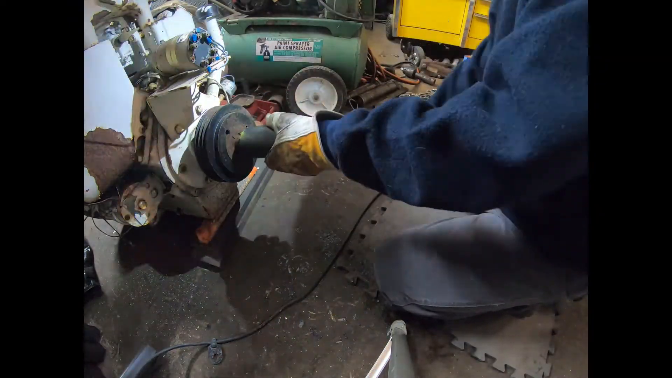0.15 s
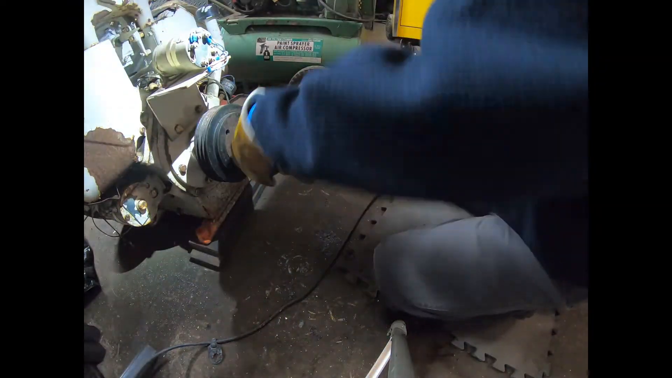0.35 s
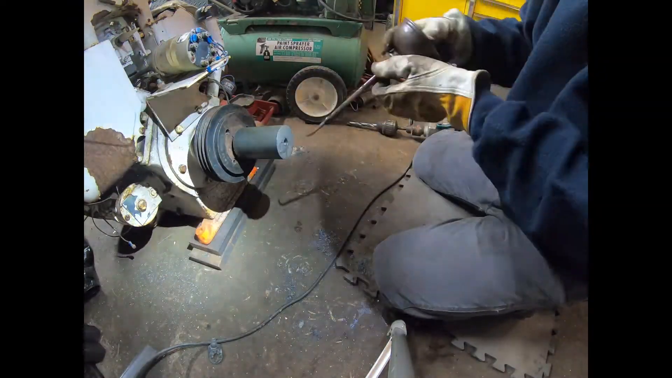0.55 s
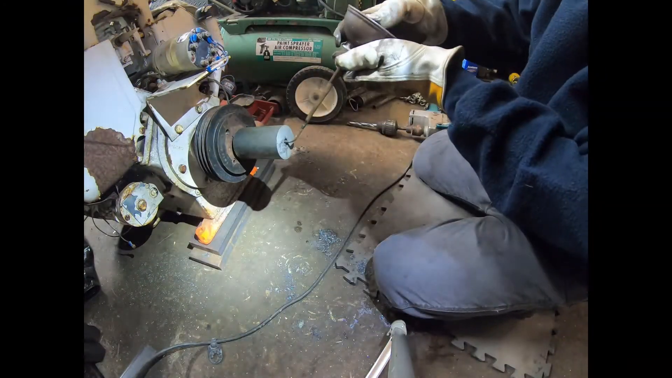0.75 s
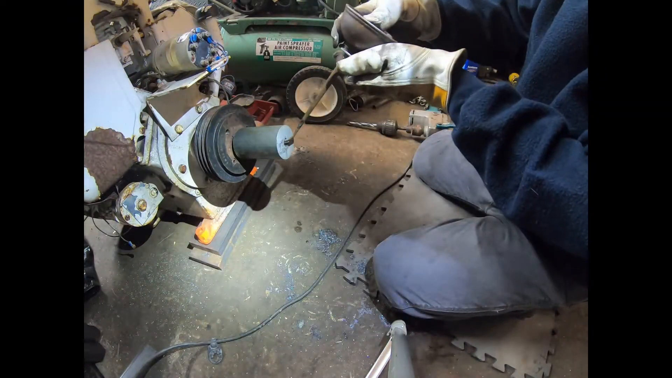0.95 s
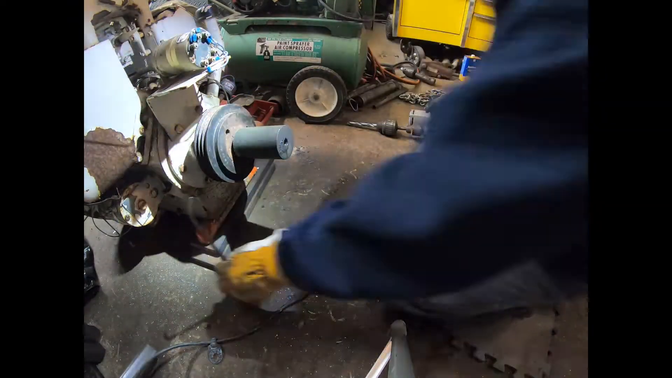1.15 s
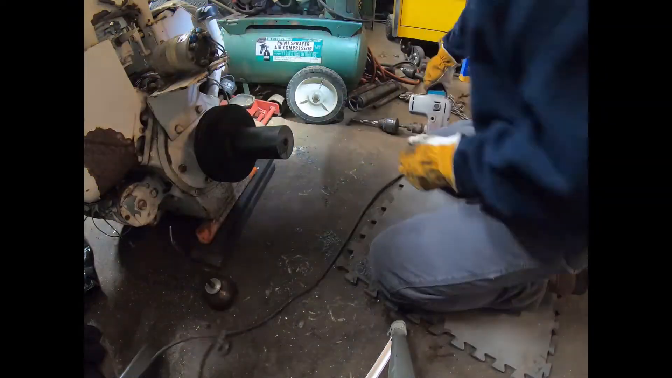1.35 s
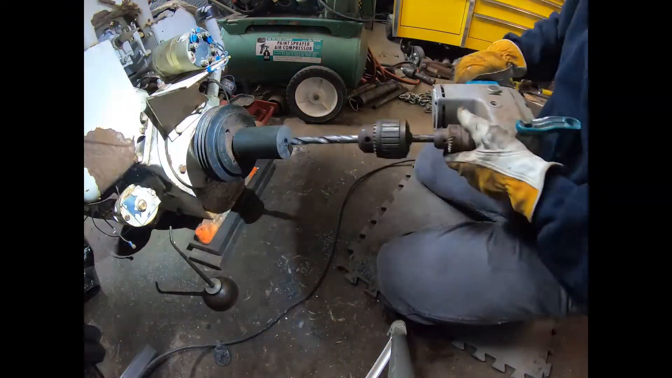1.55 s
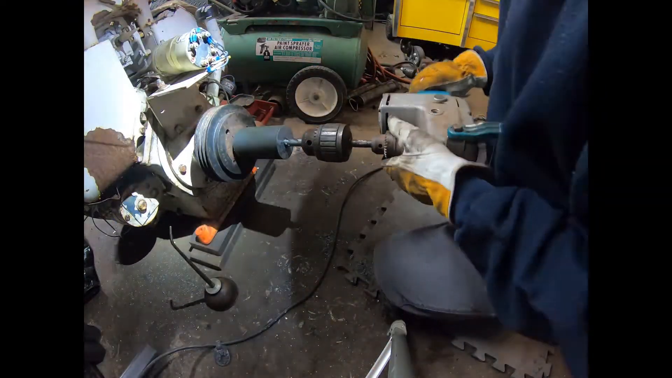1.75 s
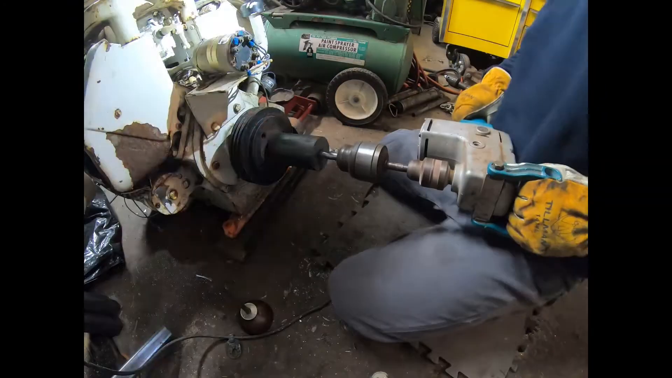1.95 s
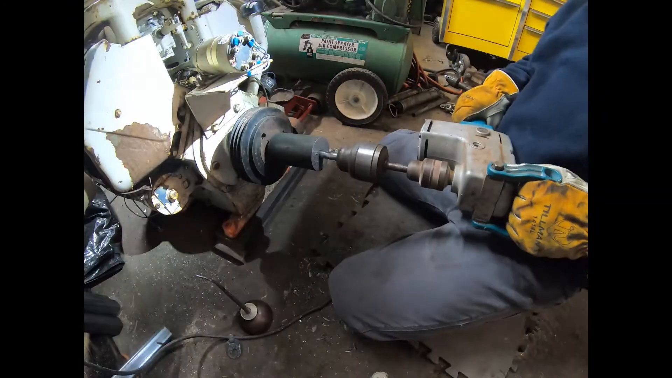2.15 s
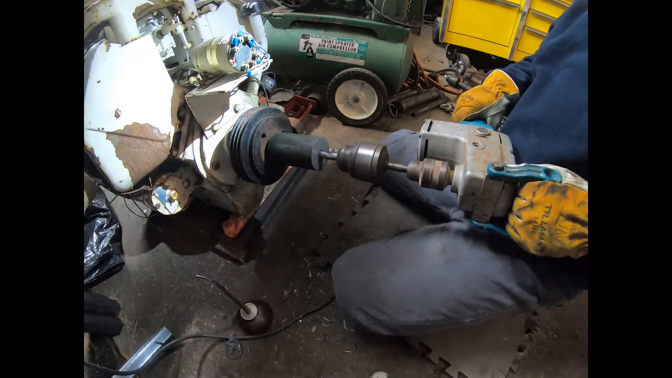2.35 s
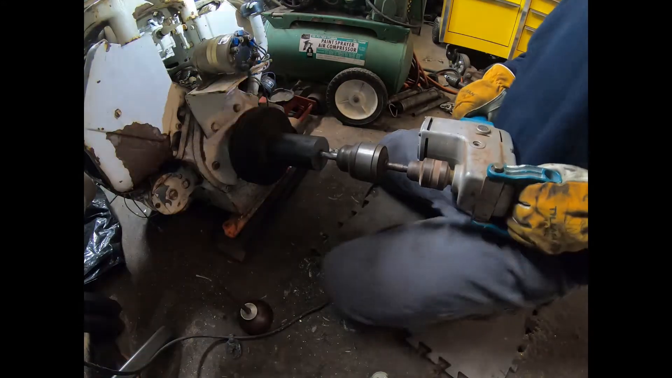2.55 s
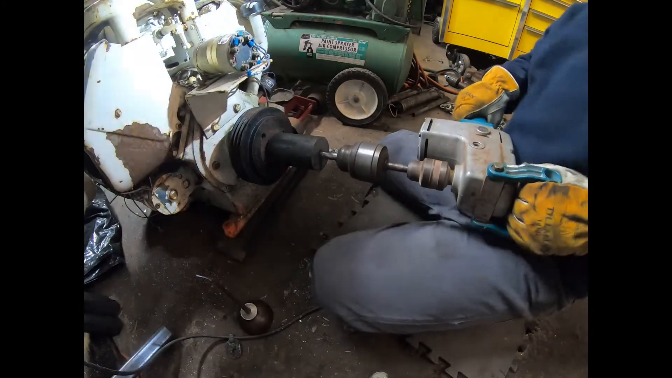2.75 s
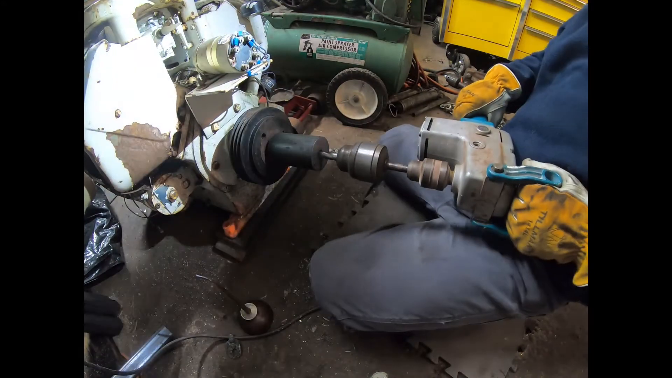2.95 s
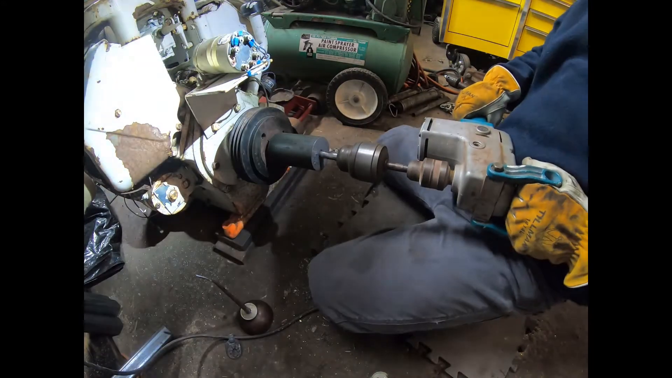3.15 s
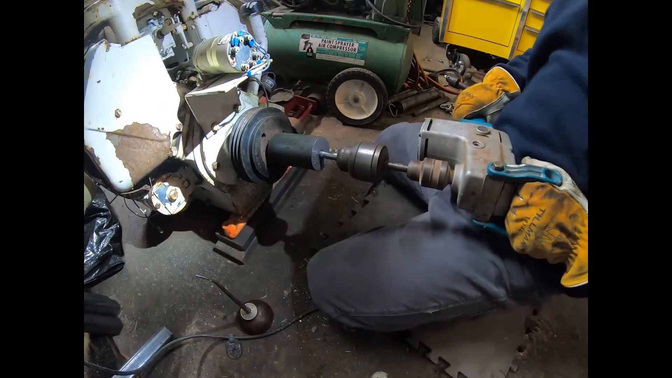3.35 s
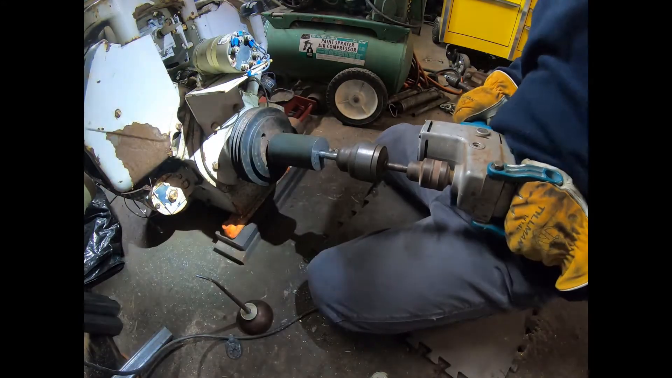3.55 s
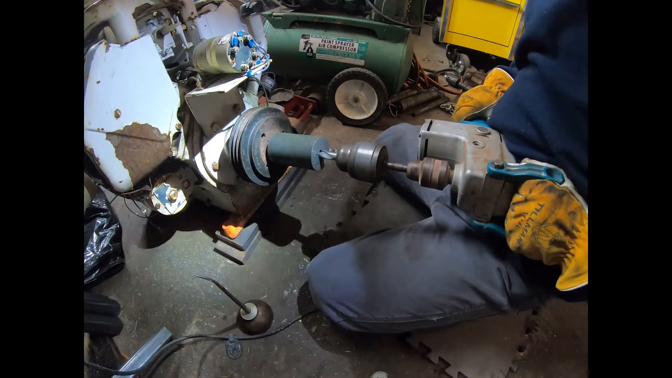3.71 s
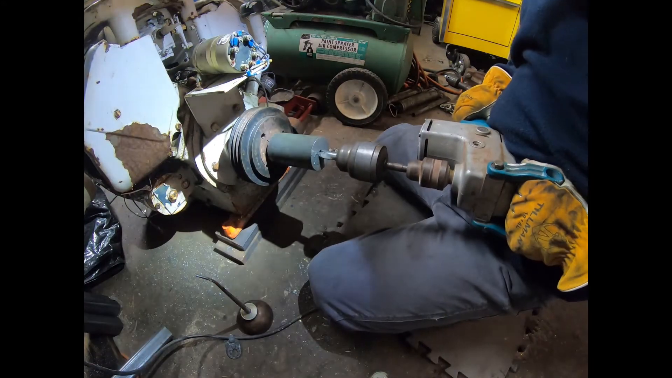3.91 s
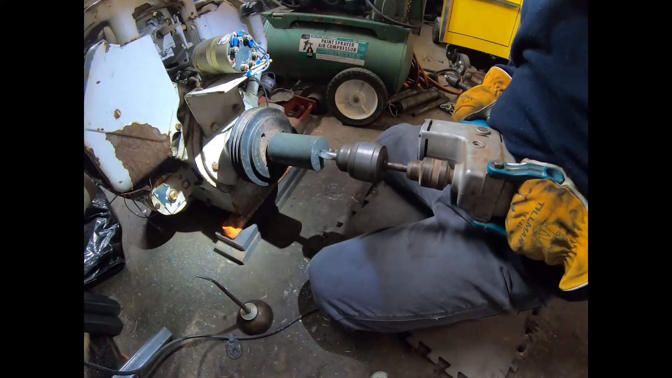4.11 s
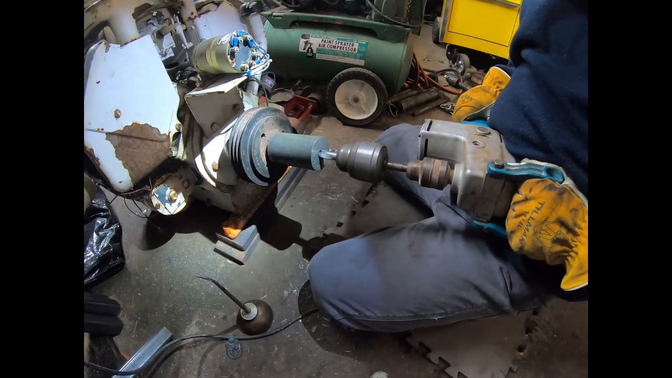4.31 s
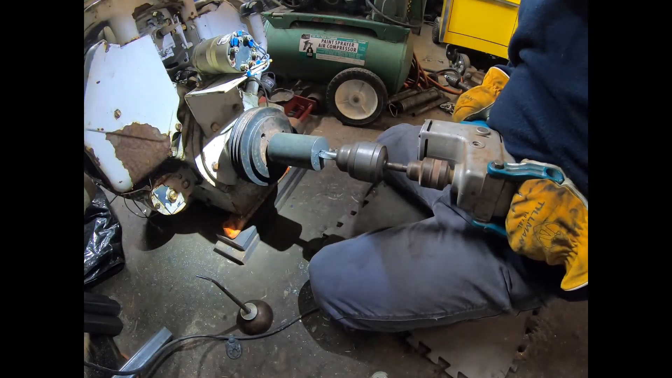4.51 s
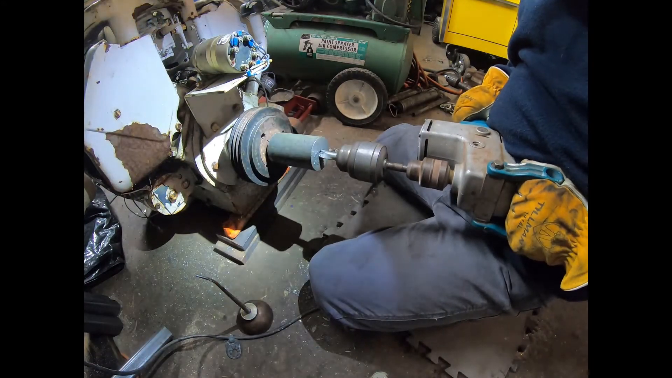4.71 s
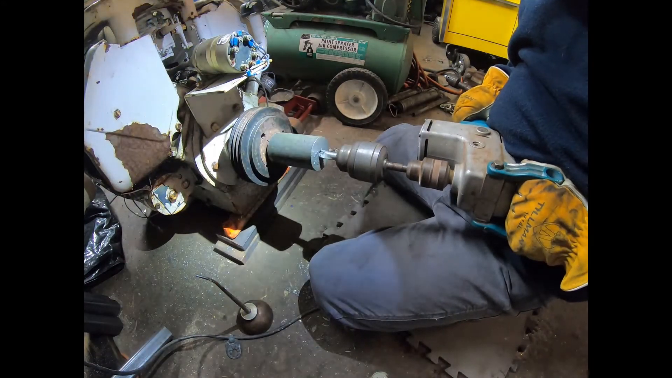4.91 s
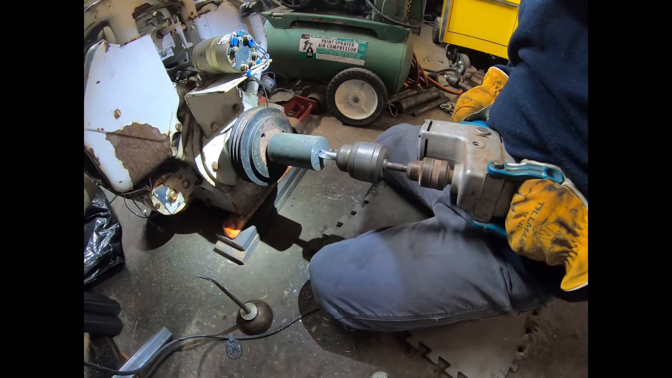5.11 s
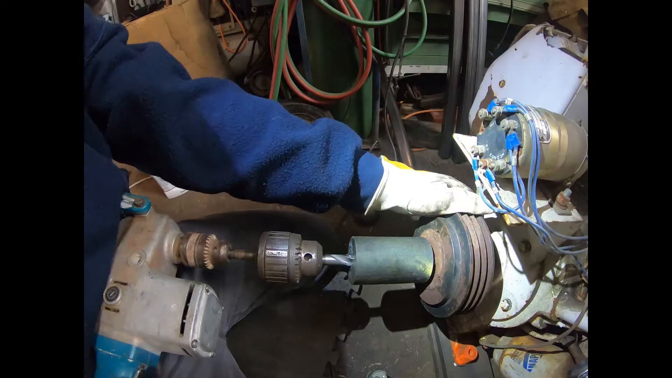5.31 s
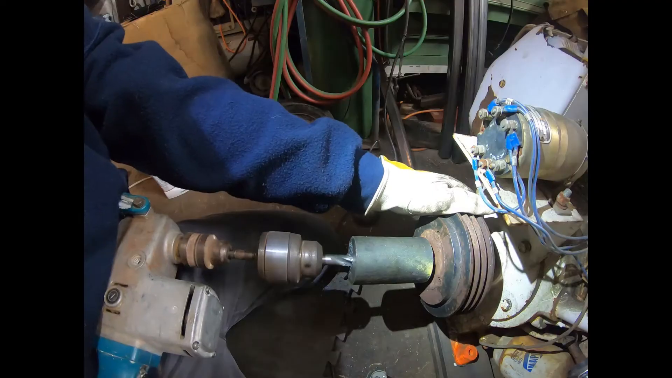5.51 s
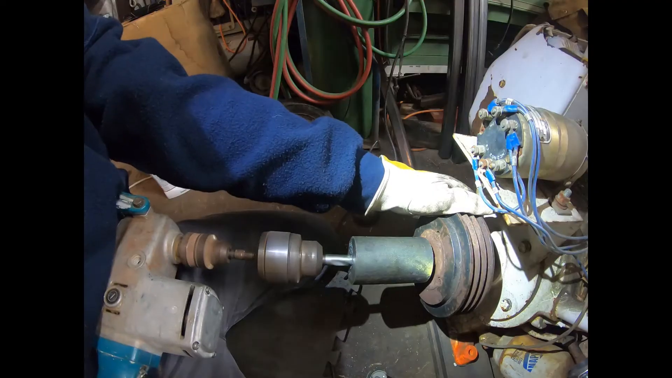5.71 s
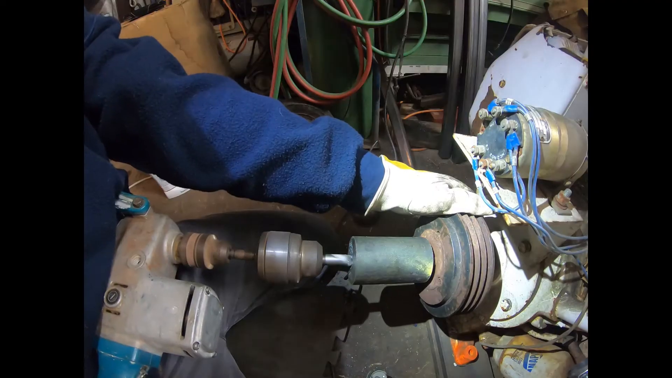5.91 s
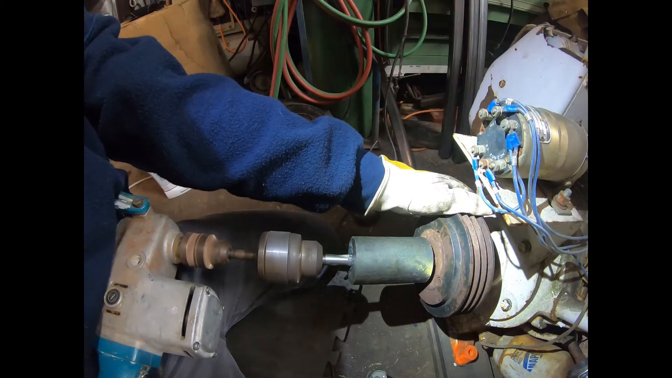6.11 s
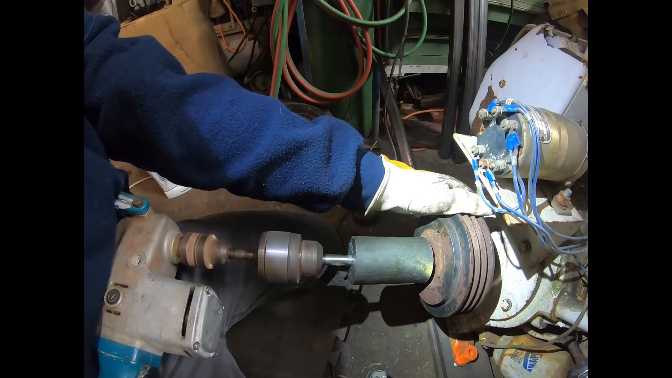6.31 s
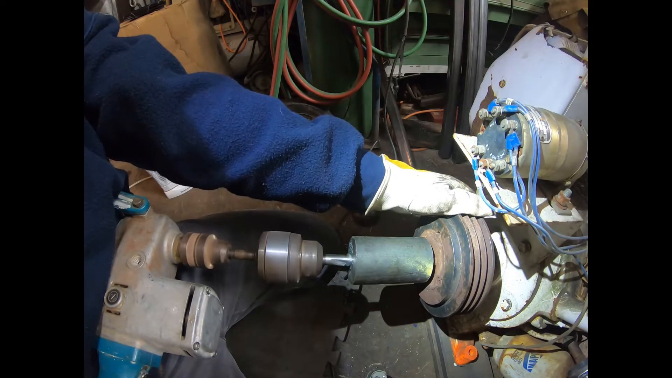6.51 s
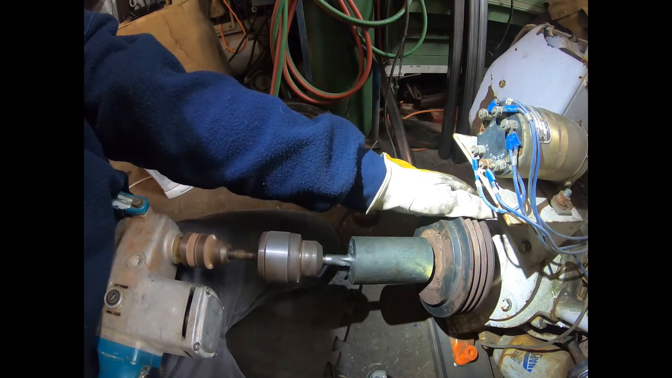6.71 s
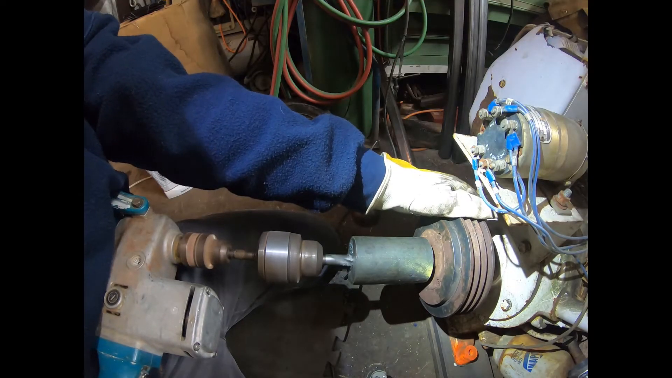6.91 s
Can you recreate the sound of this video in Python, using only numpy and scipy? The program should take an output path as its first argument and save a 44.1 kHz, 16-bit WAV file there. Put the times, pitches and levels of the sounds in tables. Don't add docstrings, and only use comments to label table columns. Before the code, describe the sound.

Metal tools knock and clink with a brief ratchet spin, then a heavy corded drill whines and rattles through steel, restarting with thin squeals.

```python
import sys
import numpy as np
from scipy import signal
from scipy.fft import rfft, irfft
from scipy.io import wavfile
from scipy.ndimage import uniform_filter1d

SR = 44100
rng = np.random.default_rng(int(sys.argv[2]) if len(sys.argv) > 2 else 0)


def voltage_ratio(level):
    return 10 ** (np.asarray(level, float) / 20)


def materialize(psi):
    bounded = np.clip(np.atleast_2d(psi).T, -1, 1)
    quanta = np.round(bounded * 32767).astype(np.int16)
    wavfile.write(sys.argv[1], SR, quanta)


N = 311346
TIME = np.arange(N) / SR

# (start [s], end [s], fade in [s], fade out [s])
TAKES = [
    (-1, 1.91, .01, .04),
    (1.912, 5.372, .034, .04),
    (5.377, 8, .035, .01),
]

# (frequency [Hz], density [dB])
SHOP_SPECTRUM = [(40, 2), (250, -5), (600, -21), (900, -19), (1250, 0), (1700, -3), (2900, -2), (6200, -10),
                 (9500, -7), (11500, -6), (15300, -12), (16000, -40)]
# (frequency [Hz], correlation [-1..1])
SHOP_ALIKE = [(60, -0.04), (240, 0.22), (950, 0.89), (3770, 0.49), (15000, -0.02)]
# (frequency [Hz], L-R [dB])
SHOP_BALANCE = [(60, -8.5), (240, -8.5), (950, -1.0), (3770, -2.5), (15000, -6.5)]
# (frequency [Hz], level [dB rms])
LAMP = [(1583, -50), (2880, -59), (3165, -60), (9491, -59), (11068, -69)]
# (time [s], peak [dB], resonance [Hz], t60 [s], crack [dB])
KNOCKS = [(.094, -24, 650, .09, -1), (.259, -23, 770, .09, -1), (.289, -18, 750, .07, -2),
          (.334, -33, 900, .06, 0), (.498, -33, 300, .04, 3), (1.372, -32, 2200, .16, -2),
          (1.661, -37, 800, .06, 0), (1.768, -19, 1000, .08, 0)]
# (time [s], L-R [dB])
HAND_PLACES = [(.09, -7), (.26, -6), (.34, -2.5), (1.9, -2)]
# (time [s], peak [dB],
# resonance [Hz], t60 [s], crack [dB])
CLINKS = [(.2144, -15, 3830, .022, -3), (.2204, -17, 3800, .035, -6), (.2882, -28, 3900, .04, 0),
          (.3661, -23, 4500, .045, 5), (.5013, -23, 4500, .04, 6), (.5114, -27, 7500, .02, 3),
          (1.2351, -17, 4310, .03, -9), (1.2615, -15, 4290, .025, -12), (1.2715, -17, 4300, .035, -7),
          (1.504, -30, 6000, .015, 3), (1.7679, -18, 4600, .07, 5), (5.5064, -22, 3040, .04, 2),
          (5.5757, -11, 3200, .03, -3)]
# (time [s], tock [dB], tick delay [s], tick [dB])
FIRST_TEETH = [(.785, -16, .0196, -8), (.825, -8, .01, -10)]
# (frequency [Hz], level [dB], t60 [s])
TOCK_MODES = [(1300, -6, .003), (2300, -1, .003), (3600, 0, .003), (6500, -2, .0015)]
# (frequency [Hz], level [dB], t60 [s])
TICK_MODES = [(8000, -5, .0012), (12300, -1, .004), (14800, -4, .002)]
# (frequency [Hz], level [dB], t60 [s])
HANDLE_MODES = [(1500, -3, .003), (2400, -1, .003), (4200, -1, .006), (12300, -3, .001), (7500, 0, .001)]
# (time of peak [s], level [dB], swell [s], fade [s])
RUSTLES = [
    (1.376, -39, .02, .08),
    (1.68, -47, .15, .16),
    (1.771, -29, .003, .035),
]
# (frequency [Hz], density [dB])
CLOTH_SPECTRUM = [(300, -20), (600, 0), (2500, -3), (6000, -12), (15000, -16)]

# (time [s], blade pitch [Hz], whine [dB])
BORING_SPEED = [(1.93, 4646, -33), (1.95, 4646, -21), (2.1, 4651, -22), (2.12, 4652, -27),
                (2.72, 4655, -26), (2.78, 4656, -22.5), (3.05, 4657, -25), (3.3, 4664, -30),
                (3.78, 4659, -27), (4.09, 4605, -20), (5.37, 4603, -21)]
# (time [s], half length [s], whine change [dB])
SNAGS = [(2.52, .05, -9), (2.74, .025, -8), (3.19, .08, -8), (4.36, .01, -6), (4.87, .04, -5)]
# (time [s], share [0..1])
LEANING = [(3.4, 0), (4.1, 1)]
# (frequency [Hz], density [dB])
GEARS_FREE = [(180, -37), (300, -10), (550, -17), (1000, -10), (1570, -6), (1820, -3), (3400, -5),
              (4400, -9), (5000, -13), (5500, -19), (9500, -26), (11500, -42), (14000, -60)]
# (frequency [Hz], density [dB])
GEARS_LOADED = [(180, -40), (300, -14), (650, -17), (1000, -9), (1500, -6), (2100, -5), (3100, -3),
                (4300, -9), (5000, -14), (5500, -20), (9500, -26), (11500, -42), (14000, -58)]
# (centre [Hz], width [Hz], rise [dB])
HOUSING = [(940, 70, 5), (1370, 110, 7), (1760, 90, 6), (2030, 150, 5), (3030, 130, 6), (3480, 120, 4),
           (6900, 300, 3)]
# (frequency [Hz], correlation [0..1])
NEAR_ALIKE = [(60, 1), (600, .993), (2400, .999), (8000, .96), (15000, .96)]
# (frequency [Hz], density [dB])
BUFFET_SPECTRUM = [(8.8, -36), (15, -6), (43, 0), (102, 0), (227, -11), (421, -24), (600, -26), (780, -56),
                   (1320, -120)]
# (time [s], level [dB])
AIR_STREAM = [(1.95, -23), (2.15, -23), (2.2, -18), (3.94, -21), (4.3, -19), (4.34, -29), (4.4, -20),
              (5.33, -24)]
# (time [s], peak [dB], resonance [Hz], t60 [s], crack [dB])
CHIPS = [
    (2.037, -13, 3600, .06, -20),
    (2.24, -14, 3600, .06, -20),
    (3.325, -12, 3700, .06, -20),
    (3.732, -31, 700, .05, 22),
]
# (from [s], to [s])
CHATTERS = [(3.76, 3.87), (4.36, 4.52), (4.62, 5.3)]

# (frequency [Hz], density [dB])
IDLE_SPECTRUM = [(40, -20), (100, -22), (200, -4), (500, -4), (1400, -22), (3000, -25), (5000, -38),
                 (9000, -55)]
# (frequency [Hz], level [dB rms])
HUM = [(199.2, -48)]
# (frequency [Hz], density [dB])
RUN_GEARS = [(20, -22), (100, -16), (320, -10), (455, -13), (745, -8), (1060, -11), (1330, -6), (1700, -7),
             (3300, -6), (5080, -10), (6600, -6), (8300, -14), (10000, -27), (14000, -42)]
# (centre [Hz], width [Hz], rise [dB])
RUN_HOUSING = [(740, 100, 2), (1300, 150, 3), (2250, 300, 2), (3200, 300, 2), (6200, 300, 2),
               (6900, 400, 2), (10900, 140, 13)]
# (frequency [Hz], correlation [-1..1])
RUN_ALIKE = [(60, 0.24), (130, 0.67), (290, 0.9), (640, 0.72), (1410, 0.44), (3100, 0.82), (6820, 0.24),
             (15000, -0.16)]
# (frequency [Hz], L-R [dB])
RUN_BALANCE = [(60, -0.5), (130, -0.5), (290, 0.0), (640, 0.0), (1410, -2.0), (3100, -0.5), (6820, -8.0),
               (15000, -1.0)]
# (time [s], level [dB])
RUN_LEVEL = [(5.498, -80), (5.507, -38), (5.53, -38), (5.575, -27), (5.69, -25), (6.13, -28), (6.9, -30),
             (7.06, -31.5)]
# (blade pitch [Hz], level [dB])
VENTS = [(1300, -56), (2100, -38), (2850, -35), (3060, -24), (3190, -21), (3400, -27), (4150, -30),
         (4290, -23.5), (4400, -25), (4450, -28)]
# (blade pitch [Hz], level [dB])
VENTS_OCTAVE = [(1300, -48), (2100, -39), (2700, -34), (3100, -33), (3600, -33), (3850, -38), (4200, -43),
                (4450, -46)]
# (time [s], length [s], level [dB], from [Hz], to [Hz])
SQUEALS = [(5.606, .018, -30, 8880, 8850), (6.442, .018, -26, 9450, 9320), (6.759, .042, -16.5, 8920, 9350),
           (6.861, .025, -24, 9400, 9150), (6.893, .04, -22, 9200, 8760), (6.933, .07, -18, 8810, 8970),
           (7.003, .027, -24.5, 9050, 9290), (7.03, .025, -29, 9250, 9200)]

FAN_BLADES = 12


def rms_one(x):
    return x / np.sqrt(np.mean(x ** 2) + 1e-20)


def in_time(rows):
    s, *columns = np.transpose(rows)
    return [np.interp(TIME, s, c) for c in columns]


def at_hz(points, hz):
    points_hz, values = np.transpose(points)
    return np.interp(np.log(hz + 1), np.log(points_hz), values)


def filtered(x, hz, kind, order):
    return signal.sosfilt(signal.butter(order, hz, kind, fs=SR, output="sos"), x)


def split(x, hz):
    low = signal.sosfiltfilt(signal.butter(2, hz, fs=SR, output="sos"), x)
    return low, x - low


def drift(rate_hz):
    every, settle = 40, 2000
    r = np.exp(-2 * np.pi * every * rate_hz / SR)
    steps = rng.standard_normal(N // every + settle + 2)
    slow = signal.lfilter([1], [1, -2 * r, r * r], steps)[settle:]
    return np.interp(np.arange(N) / every, np.arange(len(slow)), rms_one(slow))


def pan(x, db):
    return np.array([x * voltage_ratio(db / 2), x * voltage_ratio(-db / 2)])


def tone(hz, wobble_hz=0):
    turns = np.cumsum(hz + wobble_hz * drift(40.0)) / SR + rng.random()
    return np.sqrt(2) * np.sin(2 * np.pi * turns)


def coloured(spectrum, alike, balance=((1, 0), (2, 0)), modes=(), grain_db=0., flicker=1):
    hz = np.fft.rfftfreq(N, 1 / SR)
    level = voltage_ratio(at_hz(spectrum, hz))
    for centre_hz, width_hz, rise_db in modes:
        level = level * (1 + (voltage_ratio(rise_db) - 1) / (1 + (2 * (hz - centre_hz) / width_hz) ** 2))
    grain = voltage_ratio(grain_db * np.minimum(rng.exponential(1, N), 4))
    mid, side = rfft(rng.standard_normal((2, N)) * grain * flicker) * level
    c = np.clip(at_hz(alike, hz), -1, 1)
    mid, side = np.sqrt(1 + c) * mid, np.sqrt(1 - c) * side
    tilt = voltage_ratio(at_hz(balance, hz) / 2)
    return rms_one(irfft(np.array([(mid + side) * tilt, (mid - side) / tilt]), N))


def ring(x, hz, t60_s):
    r, w = voltage_ratio(-60 / (t60_s * SR)), 2 * np.pi * hz / SR
    return signal.lfilter([0, np.sin(w)], [1, -2 * r * np.cos(w), r * r], x)


def shop_air():
    flicker = voltage_ratio(.7 * drift(8.0))
    return voltage_ratio(-44.8) * coloured(SHOP_SPECTRUM, SHOP_ALIKE, SHOP_BALANCE, flicker=flicker)


def lamp_whine():
    return sum(voltage_ratio(db) * tone(hz, wobble_hz=1.5) for hz, db in LAMP)


def blows(events, q, crack_hz, rise_s, places):
    out, t = np.zeros((2, N)), np.arange(4410) / SR
    for s, peak_db, hz, t60_s, crack_db in events:
        mid, *sides = rng.standard_normal((3, len(t)))
        rattle = (mid + .3 * np.array(sides)) * voltage_ratio(-60 * t / t60_s) * np.minimum(t / rise_s, 1)
        body = ring(ring(rattle, hz, q / hz), hz, q / hz)
        crack = filtered(rattle * voltage_ratio(-30 * t / t60_s), crack_hz, "band", order=2)
        sound = body / np.abs(body).max() + voltage_ratio(crack_db) * crack / np.abs(crack).max()
        pan_db = np.interp(s, *np.transpose(places))
        sides_gain = voltage_ratio(np.array([[pan_db], [-pan_db]]) / 2)
        out[:, round(s * SR):][:, :len(t)] += voltage_ratio(peak_db - 3) * sound * sides_gain
    return out


def pawl(events, modes, buzz_db, cut_hz):
    out, t = np.zeros((2, N)), np.arange(1300) / SR
    for s, peak_db in events:
        snap = sum(voltage_ratio(db + 2.5 * rng.standard_normal()) * ring(t == 0, hz, t60_s) for hz, db, t60_s in modes)
        snap = filtered(snap, cut_hz, "high", order=2)
        rebounds_db = 2.5 * rng.exponential(1, len(t)) - 60 * t / .036
        rebounds = rng.standard_normal((2, len(t))) * voltage_ratio(rebounds_db)
        buzz = sum(voltage_ratio(db) * ring(rebounds, hz, t60_s) for hz, db, t60_s in HANDLE_MODES)
        buzz = rms_one(filtered(buzz, 1100, "high", order=2))
        sound = snap / np.abs(snap).max() + voltage_ratio(buzz_db) * buzz
        out[:, round((s + .0014) * SR):][:, :len(t)] += voltage_ratio(peak_db) * sound
    return out


def ratchet():
    spin_s, tooth_s, spin_teeth = .849, .0284, 7
    tock_db, tick_after_s, tick_db = -7.5, .0152, -10.5
    spin = [(spin_s + tooth_s * k, tock_db, tick_after_s, tick_db) for k in range(spin_teeth)]
    teeth = FIRST_TEETH + spin
    tocks = [(s, db) for s, db, _, _ in teeth]
    ticks = [(s + after_s, db) for s, _, after_s, db in teeth]
    return pawl(tocks, TOCK_MODES, buzz_db=-24, cut_hz=900) + pawl(ticks, TICK_MODES, buzz_db=-27, cut_hz=4500)


def cloth():
    noise = coloured(CLOTH_SPECTRUM, [(300, .9), (9000, .5)], grain_db=5.0)
    brush = 0
    for s, db, swell_s, fade_s in RUSTLES:
        brush = brush + voltage_ratio(db - 20 * np.maximum((s - TIME) / swell_s, (TIME - s) / fade_s))
    return voltage_ratio(1.5) * brush * noise


def handling():
    knocks = blows(KNOCKS, q=4.5, crack_hz=[700, 1400], rise_s=.0025, places=HAND_PLACES)
    return shop_air() + lamp_whine() + knocks + ratchet() + cloth()


def drill_gears(blade_hz, lean):
    turn = 1 + .15 * tone(blade_hz / FAN_BLADES)
    flicker = turn * voltage_ratio(.8 * drift(25.0))
    free = coloured(GEARS_FREE, NEAR_ALIKE, modes=HOUSING, grain_db=1.5, flicker=flicker)
    loaded = coloured(GEARS_LOADED, NEAR_ALIKE, modes=HOUSING, grain_db=1.5, flicker=flicker)
    gears = voltage_ratio(-.5) * (np.sqrt(1 - lean) * free + np.sqrt(lean) * loaded)
    for hz, _, _ in HOUSING:
        sing_db = -16.5 + at_hz(GEARS_FREE, hz) + 3 * drift(3.0)
        gears = gears + voltage_ratio(sing_db) * rms_one(ring(rng.standard_normal(N), hz, t60_s=.08))
    return voltage_ratio(-18.8 - lean + .7 * drift(5.0)) * gears


def fan_whine(blade_hz, whine_db, lean):
    for s, half_s, db in SNAGS:
        whine_db = whine_db + db * np.exp(-((TIME - s) / half_s) ** 2)
    waver_db = (1.8 - .8 * lean) * drift(25.0)
    whine = voltage_ratio(whine_db - .5 + waver_db) * tone(blade_hz, wobble_hz=8 - 4 * lean)
    return whine + voltage_ratio(-50 + 1.5 * drift(10.0)) * tone(2 * blade_hz, wobble_hz=5.0)


def air_buffet():
    buffet = coloured(BUFFET_SPECTRUM, [(1, 1), (2, 1)], flicker=voltage_ratio(2.9 * drift(25.0)))
    return voltage_ratio(in_time(AIR_STREAM)[0] + .2) * buffet


def edge_chatter():
    on = sum((TIME > a) & (TIME < b) for a, b in CHATTERS)
    return voltage_ratio(-71 + 12 * on + 3 * drift(15.0)) * tone(10880, wobble_hz=60.0)


def boring():
    blade_hz, whine_db = in_time(BORING_SPEED)
    lean = np.clip(in_time(LEANING)[0], 0, 1)
    chips = blows(CHIPS, q=50.0, crack_hz=[250, 1400], rise_s=.004, places=[(0, 0)])
    drill = drill_gears(blade_hz, lean) + fan_whine(blade_hz, whine_db, lean)
    return drill + air_buffet() + edge_chatter() + chips


def idle_hum():
    idle = voltage_ratio(-47) * coloured(IDLE_SPECTRUM, RUN_ALIKE)
    hum = sum(voltage_ratio(db) * tone(hz, wobble_hz=3.0) for hz, db in HUM)
    return np.clip((5.62 - TIME) / .1, 0, 1) * (idle + hum)


def run_up_gears(blade_hz, rattle_db):
    turn = 1 + .2 * tone(blade_hz / FAN_BLADES)
    flicker = turn * voltage_ratio(.8 * drift(25.0))
    gears = coloured(RUN_GEARS, RUN_ALIKE, RUN_BALANCE, RUN_HOUSING, grain_db=1.5, flicker=flicker)
    low, rest = split(gears, 750)
    middle, top = split(rest, 4700)
    tilt_db = 3.6 * blade_hz / 1000 - 12.5
    gears = voltage_ratio(-tilt_db) * low + middle + voltage_ratio(tilt_db) * top
    rotor = voltage_ratio(rattle_db - 1 - blade_hz / 200) * tone(blade_hz / FAN_BLADES, wobble_hz=8.0)
    return voltage_ratio(rattle_db + 7) * gears + rotor


def run_up_fan(blade_hz, duck_db):
    whine_db = at_hz(VENTS, blade_hz) + duck_db + 1.5 * drift(30.0)
    whine = voltage_ratio(whine_db) * tone(blade_hz, wobble_hz=4.0)
    octave_db = at_hz(VENTS_OCTAVE, blade_hz) + 3 * drift(20.0)
    octave = voltage_ratio(octave_db) * tone(2 * blade_hz, wobble_hz=8.0)
    return whine + pan(octave, -7.0)


def bit_squeals():
    slip_db_per_khz, pan_db_at_8750_hz, pan_db_per_khz = -14, -10, 11
    hz, db, held = np.full(N, 9000.), np.full(N, -60.), np.zeros(N)
    for s, length_s, peak_db, from_hz, to_hz in SQUEALS:
        on = (TIME >= s) & (TIME < s + length_s)
        u = (TIME[on] - s) / length_s
        above_hz = abs(to_hz - from_hz) * (u if to_hz > from_hz else 1 - u) ** 3
        hz[on] = min(from_hz, to_hz) + above_hz
        db[on] = peak_db + slip_db_per_khz * above_hz / 1000
        held[on] = 1
    level = uniform_filter1d(held * voltage_ratio(db), size=200)
    pan_db = pan_db_at_8750_hz + pan_db_per_khz * (hz - 8750) / 1000
    hz, pan_db = uniform_filter1d([hz, pan_db], size=130)
    squeal = level * voltage_ratio(.8 * drift(90.0)) * tone(hz, wobble_hz=20.0)
    left, right = pan(squeal, pan_db)
    right = .62 * (right + np.roll(right, 1))
    return np.array([left, right]), db


def gain_duck(squeal_db):
    duck_db, above_db, recover_db_per_s = -6, -25, 60
    want_db = duck_db * np.clip((squeal_db - above_db) / 8, 0, 1)
    recovery_db = recover_db_per_s * TIME
    held_db = np.minimum.accumulate(want_db - recovery_db) + recovery_db
    return signal.lfilter([.003], [1, -.997], held_db)


def run_up():
    trigger_s, top_hz = 5.5, 4595
    quick_hz, quick_s, slow_hz, slow_s = 2275, .18, 1398, .6
    since_s = np.maximum(TIME - trigger_s, 0)
    blade_hz = top_hz - quick_hz * np.exp(-since_s / quick_s) - slow_hz * np.exp(-since_s / slow_s)
    squeal, squeal_db = bit_squeals()
    duck_db = gain_duck(squeal_db)
    gears = run_up_gears(blade_hz, in_time(RUN_LEVEL)[0] + duck_db)
    fan = (since_s > 0) * run_up_fan(blade_hz, duck_db)
    return idle_hum() + gears + fan + squeal


def scene():
    clinks = blows(CLINKS, q=16.0, crack_hz=[1900, 14000], rise_s=.0004, places=[(0, -1.5)])
    quiet = handling() + clinks
    quiet = filtered(quiet, 450, "high", order=2) - voltage_ratio(-18) * filtered(quiet, 150, "low", order=1)
    parts = quiet, boring(), run_up() + filtered(clinks, 7000, "low", order=2)
    out = 0
    for part, (start_s, end_s, in_s, out_s) in zip(parts, TAKES):
        fade = np.clip(np.minimum((TIME - start_s) / in_s, (end_s - TIME) / out_s), 0, 1)
        out = out + part * fade ** 1.5
    return out


def masked(x, below_db, spread_db):
    hz, _, frames = signal.stft(x, SR, nperseg=2048)
    power = np.mean(np.abs(frames) ** 2, axis=0) + 1e-20
    masker = power[(hz > 5200) & (hz < 9700)].mean(axis=0)
    spare = rms_one(uniform_filter1d(rng.standard_normal(len(masker)), size=3))
    band_hz = 430
    for low_hz in np.arange(9700, 17000, band_hz):
        band = (hz >= low_hz) & (hz < low_hz + band_hz)
        chance_db = spread_db * (spare + .6 * rng.standard_normal(len(masker)))
        band_db = 10 * np.log10(power[band].max(axis=0) / masker)
        frames[:, band] *= band_db + chance_db > -below_db
    return signal.istft(frames, SR, nperseg=2048)[1][:, :N]


def band_limit(x):
    return signal.sosfilt(signal.butter(12, 16980, fs=SR, output="sos"), x)


def record(dry):
    ceiling, fold_hz = .8, 24000
    dry = dry / (1 + (dry / ceiling) ** 6) ** (1 / 6)
    mirror = filtered(dry, [10100, 11900], "band", order=3) * np.cos(2 * np.pi * fold_hz * TIME)
    mirror = filtered(mirror, [12000, 15800], "band", order=6)
    mix = masked(dry + voltage_ratio(-5) * mirror, below_db=21.0, spread_db=3.5)
    mix = filtered(mix, 16200, "low", order=10)
    return band_limit(mix)


dry = scene()
out = record(dry)
materialize(out)
```